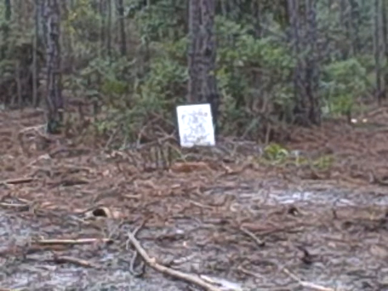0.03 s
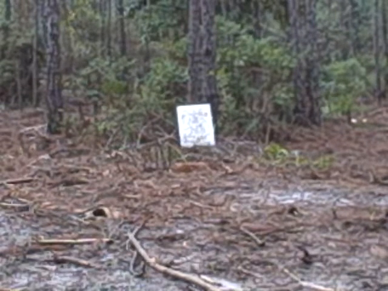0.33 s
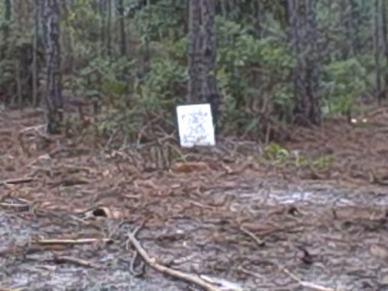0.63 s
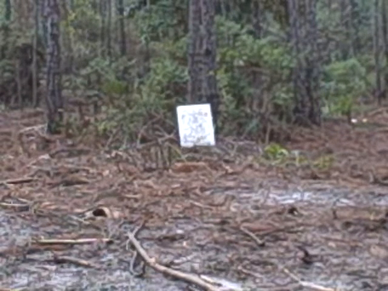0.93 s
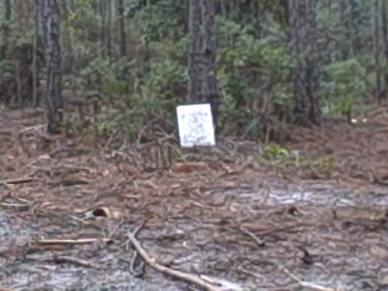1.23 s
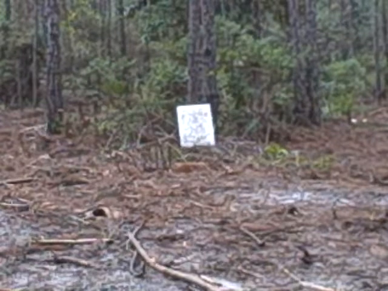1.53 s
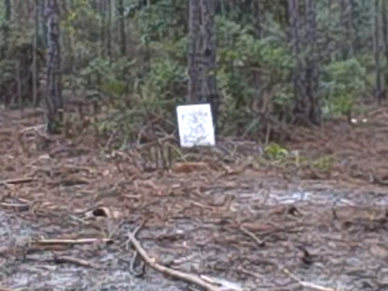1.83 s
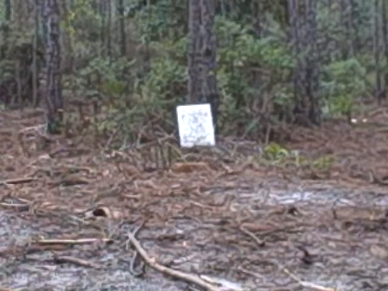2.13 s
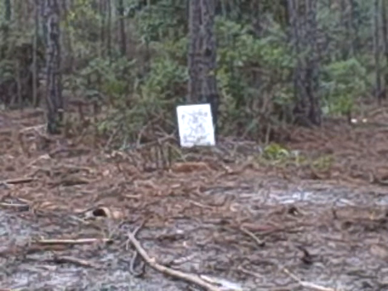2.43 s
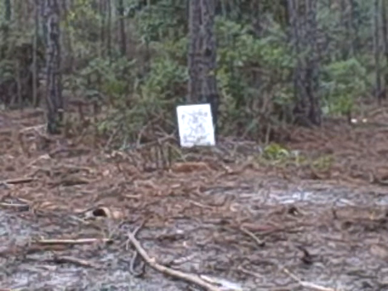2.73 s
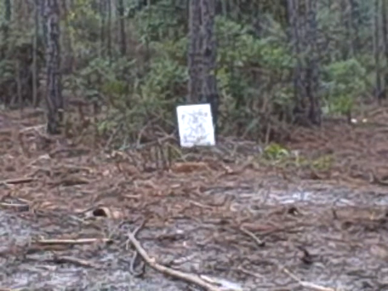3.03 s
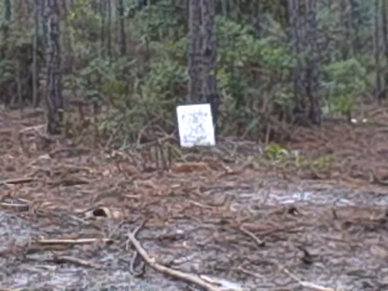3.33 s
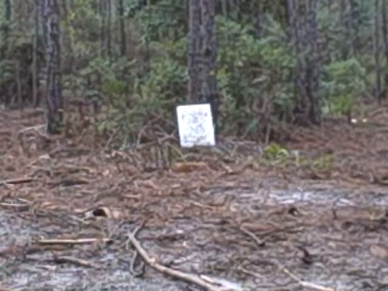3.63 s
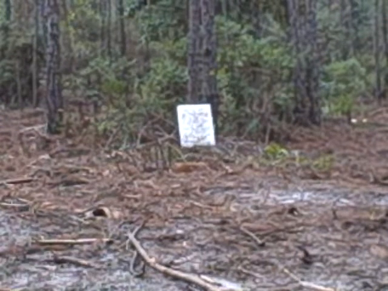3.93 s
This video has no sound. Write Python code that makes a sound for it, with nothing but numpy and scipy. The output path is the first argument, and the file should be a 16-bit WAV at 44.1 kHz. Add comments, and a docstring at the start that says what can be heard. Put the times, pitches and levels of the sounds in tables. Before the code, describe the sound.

Faint ticks in a quiet forest, then a bow shot cracks and the arrow thuds home.

```python
"""A bow is shot in a quiet pine forest, over a distant rumble; faint ticks come while the archer aims.
The release excites the bow impulsively: fittings clack, the limbs thump, the string twangs and slaps
its stop, and loose parts rattle, all dying away as damped free vibrations. A moment later the arrow
knocks into its mark. The trunks scatter the near sounds into a thin reverberation."""
import sys
import numpy as np
from scipy import signal
from scipy.fft import rfft, irfft, next_fast_len
from scipy.io import wavfile
from scipy.ndimage import map_coordinates

SR = 44100
rng = np.random.default_rng(int(sys.argv[2]) if len(sys.argv) > 2 else 0)


def master_out(mix):
    """Clip the mix to full scale and print it as 16-bit PCM to the path in sys.argv[1]."""
    frames = np.transpose(np.atleast_2d(mix))
    ceiling = np.clip(frames, -1, 1)
    pcm = np.round(ceiling * 32767).astype(np.int16)
    wavfile.write(sys.argv[1], SR, pcm)


N = 176400
T = np.arange(SR) / SR  # time since an event, t/s


def amp(db):
    """Amplitude ratio of a level in decibels."""
    return 10 ** (np.asarray(db) / 20)


def unit(x):
    """Normalisation to rms 1."""
    return x / np.sqrt(np.mean(x ** 2) + 1e-20)


def along(points, hz):
    """Interpolation of (f/Hz, value) points on a logarithmic frequency axis."""
    f, v = np.transpose(points)
    return np.interp(np.log(hz + 1), np.log(f + 1), v)


def filtered(x, response):
    """Linear filtering: the spectrum is multiplied by a frequency response."""
    m = next_fast_len(len(x) + SR // 2)
    return irfft(rfft(x, m) * response(np.fft.rfftfreq(m, 1 / SR)), m)[:len(x)]


def noise(colour, size=SR):
    """Spectral shaping of white noise, at rms 1."""
    return unit(filtered(rng.standard_normal(size), lambda hz: amp(along(colour, hz))))


def wobble(knots_per_s):
    """Random modulation: a spline through Gaussian values."""
    knots = rng.standard_normal(int(N * knots_per_s / SR) + 4)
    return map_coordinates(knots, [np.arange(N) * knots_per_s / SR])


def swell(s, width_s, db):
    """Gaussian envelope, peaking at time s and down to 1/e at width_s either side."""
    return amp(db) * np.exp(-((np.arange(N) / SR - s) / width_s) ** 2)


def add(track, s, sound):
    """Superposition of a sound on the track from time s."""
    room = track[round(s * SR):][:len(sound)]
    room += sound[:len(room)]


def burst(x, t60):
    """Exponential decay of noise, scaled to the energy of its envelope."""
    fade = amp(-60 * T / t60)
    return unit(x * fade) * np.sqrt(np.mean(fade ** 2))


def ring(modes, attack_s, pitch=1):
    """Free vibration: a sum of damped modes with a soft onset."""
    partials = sum(amp(db - 60 * T / t60) * np.sin(2 * np.pi * hz * pitch * T) for hz, db, t60 in modes)
    return (1 - np.exp(-T / attack_s)) * partials


def damped(x, t60s, hold_s=0):
    """Frequency-dependent damping: after the hold, each band decays at its own rate."""
    hz, t, spectra = signal.stft(x, SR, nperseg=256)
    decay = amp(-60 * np.maximum(t - hold_s, 0) / along(t60s, hz)[:, None])
    return signal.istft(spectra * decay, SR, nperseg=256)[1][:len(x)]


def rumble():
    """Distant rumble and forest air: broadband noise under slight amplitude modulation."""
    air_spectrum = [(12, -25), (25, -1), (50, 1), (90, -6.5), (160, -9), (260, -14), (420, -15.5),
                    (740, -10), (1000, -11), (1500, -20), (2600, -33.5), (6000, -42), (15500, -46)]  # f/Hz, spectral level/dB
    return noise(air_spectrum, N) * amp(-50 + 0.45 * wobble(knots_per_s=8.84))


def drone():
    """Narrow-band noise gives a low, vague pitch that comes and goes."""
    spectrum = [(90, -35), (140, -11), (170, 3), (215, -8), (320, -17), (500, -40), (2000, -80)]  # f/Hz, level/dB
    swells = [(.2, .15, -57.5), (.8, 0.1, -61)]  # t/s, half-width/s, level/dB
    return noise(spectrum, N) * sum(swell(*row) for row in swells)


def ticks():
    """Dry ticks near the archer: each is a filter's response to an impulse with a trace of grit."""
    onsets = [(0.1681, -45.5), (1.9624, -52), (2.069, -49), (2.1475, -51), (2.2423, -45.5), (2.310, -51),
              (2.4628, -46.5), (2.610, -44), (2.7146, -45.5), (2.8832, -49.5), (3.0976, -45.5),
              (3.5426, -44.5)]  # t/s, level/dB
    spectrum = [(800, -21), (2100, 8.5), (2900, -4.5), (4400, -3.5), (8000, -11), (15000, -17.5)]  # f/Hz, level/dB
    out = np.zeros(N)
    for s, db in onsets:
        grit = burst(rng.standard_normal(SR), t60=0.0051)
        impulse = np.linalg.norm(grit) * (T == 0)
        push = np.roll(0.5 * grit + impulse, 32)  # room for the filter's spread ahead of the peak
        tick = unit(filtered(push, lambda hz: amp(along(spectrum, hz))))
        add(out, s, amp(db) * np.std(grit) * tick)
    return out


def trees(x, paths=6, step_s=0.003):
    """Scattering by trunks: successive instants take different paths, so the echo does not ring."""
    echo_spectrum = [(200, -1.5), (1300, -2.5), (4200, -3), (7000, 3), (13000, 1)]  # f/Hz, level/dB
    reverberation_times = [(200, 0.45), (1500, 0.82), (5000, .42), (14000, 0.48)]  # f/Hz, T60/s
    out = np.zeros(N)
    turn = np.arange(N) / (SR * paths * step_s)
    build_up = 1 - np.exp(-T / 0.015)
    for k in range(paths):
        share = np.maximum(0, 1 - paths * np.abs((turn + k / paths) % 1 - 0.5))
        incident = x * np.sin(share * np.pi / 2)  # equal-power crossfade
        tail = damped(noise(echo_spectrum), reverberation_times) * build_up
        out += signal.fftconvolve(incident, tail / np.linalg.norm(tail))[:N]
    return out


def rush():
    """A far-off rush: mid-band noise under a slow envelope."""
    spectrum = [(100, -27), (300, -17), (480, -4.5), (600, -4), (770, 3), (1000, -9), (1250, -9),
                (2000, -22), (5000, -41), (14000, -46)]  # f/Hz, level/dB
    return noise(spectrum, N) * swell(s=1.7, width_s=0.54, db=-56)


def twigs():
    """Duller clicks further off: a noise transient and the damped modes of wood."""
    clicks = [(.9225, -50.5, 1, -5), (.970, -57, 1, -4), (.978, -55, 1.02, -7), (1.5043, -51, 1.19, -2.5)]  # t/s, level/dB, frequency ratio, relative crack level/dB
    wood_modes = [(1870, 1.5, 0.026), (2620, 1, 0.03), (3370, -3, 0.023)]  # f/Hz, level/dB, T60/s
    crack_spectrum = [(1200, -8), (2000, 1), (4400, -2), (5200, -10), (10000, -25)]  # f/Hz, level/dB
    out = np.zeros(N)
    for s, db, pitch, crack_db in clicks:
        crack = amp(crack_db) * burst(noise(crack_spectrum), t60=0.022)
        add(out, s, amp(db) * (ring(wood_modes, attack_s=0.00045, pitch=pitch) + crack))
    return out


def brushing():
    """A faint airy brushing: high-pass noise under one envelope."""
    spectrum = [(2000, -20), (5000, 0), (14000, -3)]  # f/Hz, level/dB
    return noise(spectrum, N) * swell(s=1.15, width_s=0.14, db=-76)


def rustles():
    """Soft rustles: rapid amplitude modulation roughens short swells of treble noise."""
    spectrum = [(2000, -24), (3200, -5), (4000, 0), (5000, -11), (14000, -22)]  # f/Hz, level/dB
    swells = [(1.625, 0.038, -70.5), (1.70, 0.03, -72), (1.805, .04, -72.5)]  # t/s, half-width/s, level/dB
    envelope = sum(swell(*row) for row in swells)
    return noise(spectrum, N) * envelope * amp(3.5 * wobble(knots_per_s=150))


def shudder(rise_s=0.026):
    """Modal overlap: the dense vibration of the whole bow is heard as decaying noise."""
    spectrum = [(30, -20.5), (70, 1), (180, -5), (330, -5), (450, -3.5), (800, -4.5), (1300, -3),
                (2600, -7.5), (4000, -16), (8000, -24.5), (15000, -35)]  # f/Hz, spectral level/dB
    decay_times = [(200, 0.23), (800, 0.27), (2500, 0.11), (6000, 0.16), (12000, 0.12)]  # f/Hz, T60/s
    out = np.zeros(N)
    rise = np.minimum(T / rise_s, 1) ** 0.53
    add(out, 3.579, amp(-25.5) * rise * damped(noise(spectrum), decay_times, hold_s=rise_s))
    return out


def contact(resonances, t60, tilt_db, pitch=1, grit=0.5):
    """Impact excitation: an impulse and a scrape drive resonators, tilted by tilt_db per octave."""
    def body(f):
        tilt = amp(tilt_db * np.log2(np.maximum(f, 1000) / 5000))
        return tilt * sum((-1) ** k * amp(db) * 1j * f * width / (f0 * f0 - f * f + 1j * f * width)
                          for k, (f0, width, db) in enumerate(resonances))

    scrape = burst(rng.standard_normal(SR), t60)
    push = grit * scrape + np.linalg.norm(scrape) * (T == 0)
    return unit(filtered(push, lambda f: body(f / pitch))) * np.std(scrape)


def clacks():
    """Hard impacts of release, string and arrow excite the resonances of the fittings."""
    impacts = [(3.5812, -30.5, .005, 7), (3.5848, -25, .018, -5.5), (3.5913, -9.5, 0.0061, 2.5),
               (3.593, -9.5, 0.006, -1.5), (3.5948, -18, .005, -3.5), (3.6028, -32, .02, 1.5),
               (3.6086, -31.5, .025, -4)]  # t/s, level/dB, T60/s, tilt/(dB per octave)
    fitting_resonances = [(1300, 210, -10), (1805, 260, -5), (2350, 280, -3), (2900, 350, -4),
                          (3580, 170, 1), (4250, 220, 5), (5130, 420, 3.5), (5840, 500, -3.5),
                          (6430, 250, -3.5), (7130, 380, -3), (8400, 1400, -9), (13100, 3500, -13)]  # f/Hz, bandwidth/Hz, level/dB
    out = np.zeros(N)
    for s, db, t60, tilt_db in impacts:
        add(out, s, amp(db) * contact(fitting_resonances, t60, tilt_db))
    return out


def limbs(kick_s=3.5885):
    """The limbs pull on the air, sending a rarefaction ahead of the thump of their damped modes."""
    limb_modes = [(72.2, -24.5, 0.28), (144, -26, 0.14), (586, -32.5, .16), (873, -38.5, .17),
                  (1320, -25.5, 0.09), (1754, -28, .1)]  # f/Hz, level/dB, T60/s
    out = -swell(s=kick_s - 0.0035, width_s=0.004, db=-29)
    add(out, kick_s, ring(limb_modes, attack_s=0.0046))
    return out


def bowstring(twang_s=3.604, stop_s=3.6075):
    """The string twangs in free vibration; its impact on the stop adds a slap and a short ring."""
    string_modes = [(249, -20, 0.22), (271.3, -40.5, 1.3), (464, -36.5, 0.62), (519, -35.5, .3),
                    (557, -41, 0.51), (845, -41.5, 0.68), (1210, -41.5, 0.45)]  # f/Hz, level/dB, T60/s
    stop_modes = [(816, -25, 0.19), (1175, -32.5, 0.19), (1264, -30, .14), (1530, -31, 0.12),
                  (2224, -34, 0.15), (2700, -33.5, .1)]  # f/Hz, level/dB, T60/s
    slap_resonances = [(1820, 90, -10), (2265, 150, 0), (2430, 120, -12), (2720, 110, -3)]  # f/Hz, bandwidth/Hz, level/dB
    out = np.zeros(N)
    add(out, twang_s, ring(string_modes, attack_s=0.011))
    add(out, stop_s, ring(stop_modes, attack_s=0.001))
    add(out, stop_s, amp(-19.5) * contact(slap_resonances, t60=0.039, tilt_db=-0.5, grit=1.8))
    return out


def rattle():
    """Repeated, weakening impacts excite the resonances of loose parts."""
    impacts = [(3.6203, -32, 1.1), (3.6265, -36, .76), (3.6325, -45, 1.05), (3.6395, -44, .9),
               (3.6455, -38.5, .96), (3.654, -42, .8), (3.6588, -38.5, 1), (3.661, -41, 0.98),
               (3.690, -51, 1), (3.7265, -49, 1.08), (3.735, -53, 1.06)]  # t/s, level/dB, frequency ratio
    part_resonances = [(3200, 1200, -4), (5020, 300, 0.5), (5720, 350, 0.5), (6450, 600, -3),
                       (10000, 4000, -13)]  # f/Hz, bandwidth/Hz, level/dB
    out = np.zeros(N)
    for s, db, pitch in impacts:
        add(out, s, amp(db) * contact(part_resonances, t60=0.012, tilt_db=-5, pitch=pitch))
    return out


def arrow(strike_s=3.986):
    """Inelastic impact: the point touches, then breaks through with a crunch and a low modal knock."""
    crunch_spectrum = [(200, 6.5), (1300, -5), (2200, 4.5), (3600, -1), (4800, -13), (7000, -13),
                       (15000, -14)]  # f/Hz, level/dB
    knock_modes = [(105.6, -24, 0.056), (251, -30.5, 0.046), (604, -38.5, 0.055)]  # f/Hz, level/dB, T60/s
    breakthrough = swell(s=strike_s + 0.0028, width_s=0.0016, db=-30)
    out = noise(crunch_spectrum, N) * breakthrough
    crunch = amp(-29.5) * burst(noise(crunch_spectrum), t60=0.034)
    touch = amp(-29) * burst(rng.standard_normal(SR), t60=0.0073)
    add(out, strike_s, touch + crunch + ring(knock_modes, attack_s=0.0021))
    return out


def scene():
    """Superposition of the direct sound, its scattered field and the forest's background."""
    bow = clacks() + rattle() + limbs() + bowstring() + shudder()
    direct = bow + arrow() + ticks() + twigs()
    scattered = amp(-26) * trees(direct)
    background = rumble() + rush() + rustles() + brushing() + drone()
    return (direct + scattered + background)[None]


def record(dry, cutoff_hz=15800, edge_hz=120):
    """Band limiting: a steep low-pass removes the highest treble."""
    return np.array([filtered(x, lambda hz: (1 - np.tanh((hz - cutoff_hz) / edge_hz)) / 2) for x in dry])


dry = scene()
out = record(dry)
master_out(out)
```